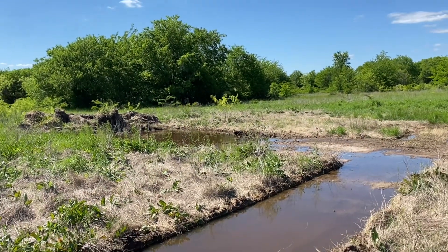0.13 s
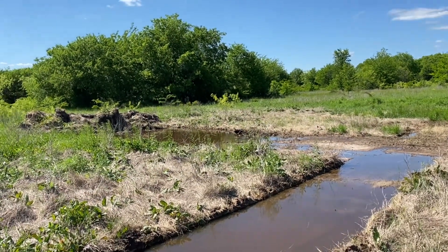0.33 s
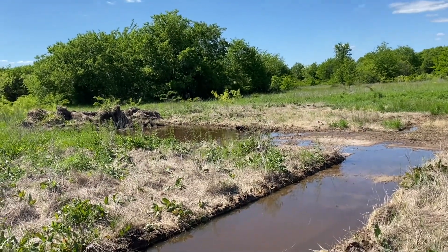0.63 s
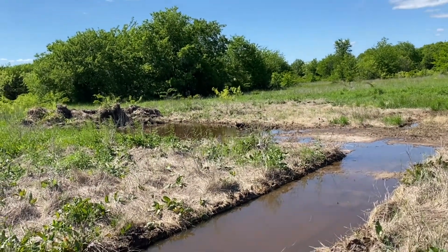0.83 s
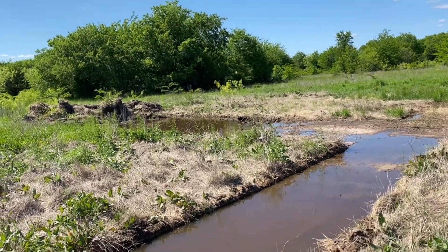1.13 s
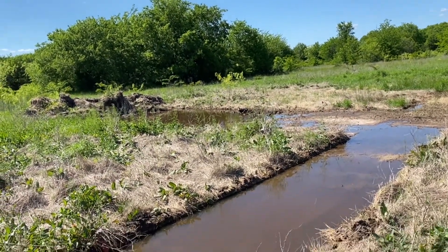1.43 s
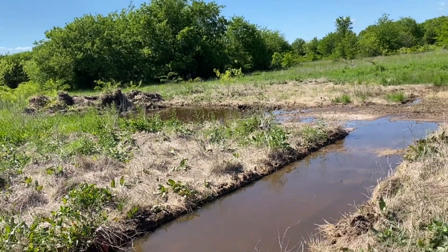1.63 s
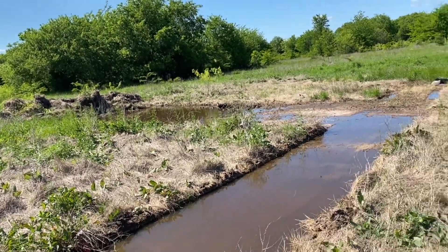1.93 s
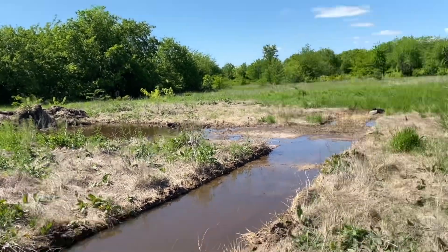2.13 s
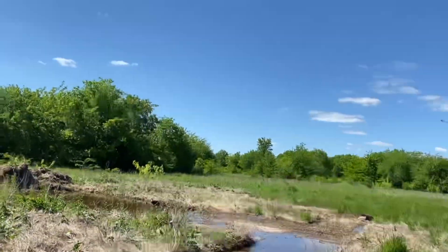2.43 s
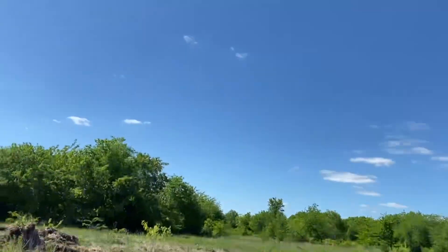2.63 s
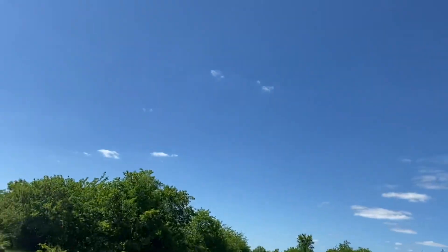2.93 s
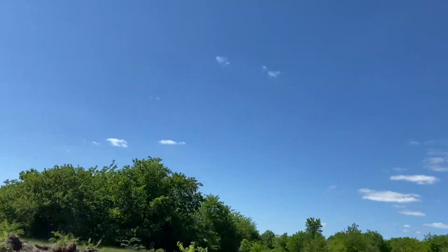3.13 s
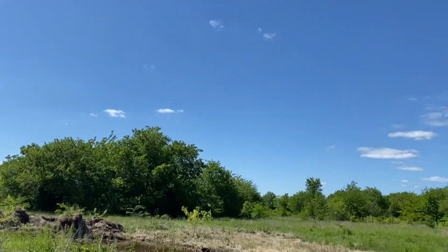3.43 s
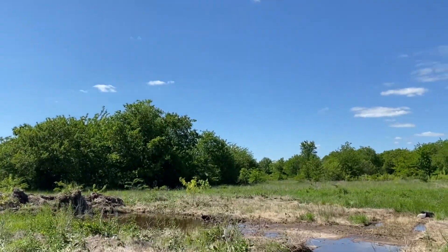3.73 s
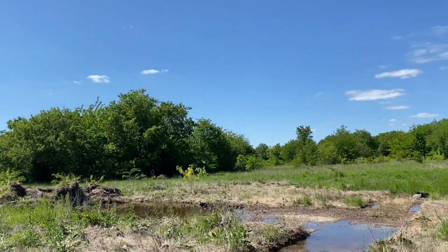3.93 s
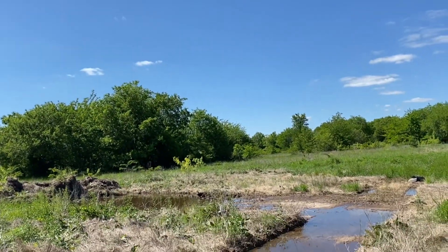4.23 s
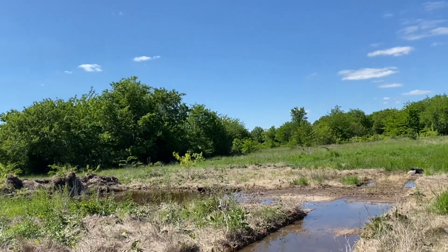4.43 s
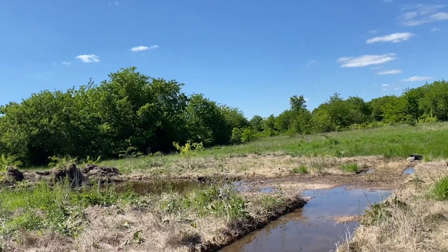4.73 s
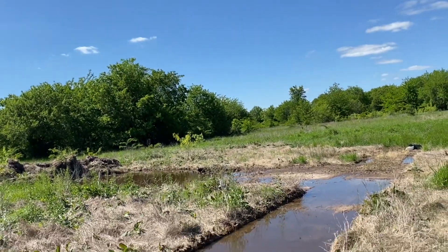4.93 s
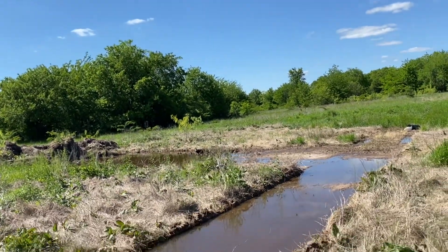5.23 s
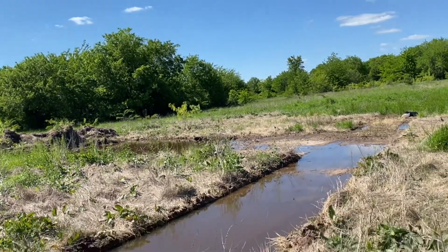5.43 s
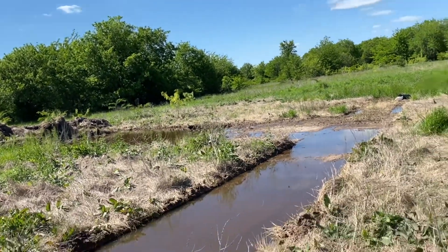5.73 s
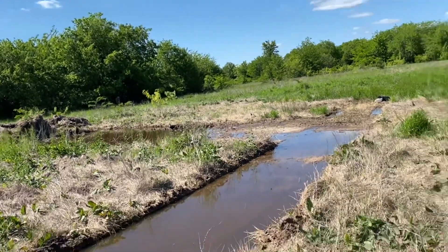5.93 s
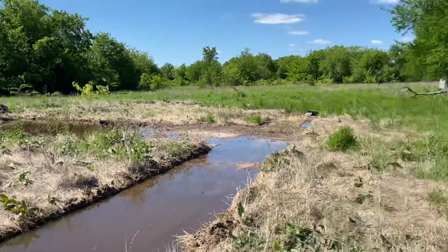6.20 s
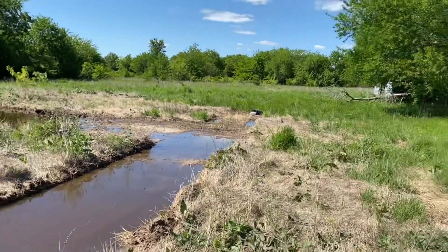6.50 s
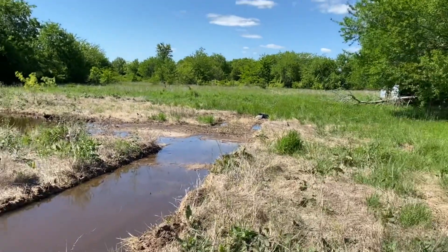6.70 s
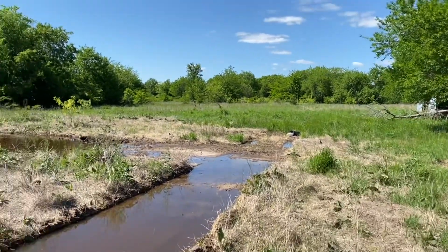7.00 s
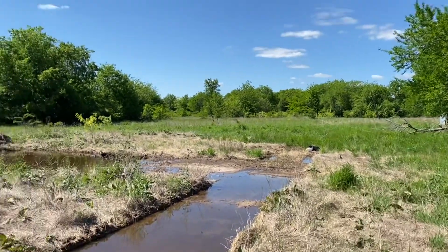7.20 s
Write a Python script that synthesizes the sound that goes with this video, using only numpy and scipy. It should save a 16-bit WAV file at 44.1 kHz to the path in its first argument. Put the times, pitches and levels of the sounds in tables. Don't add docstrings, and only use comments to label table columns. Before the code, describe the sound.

From the start a near frog creaks evenly, about every 0.4 seconds until the end: each call is a tenth-of-a-second comb of some thirteen dry, ringing pulses around 3 kHz, quickening, rising and swelling, then stopping short. Four other frogs answer irregularly, fainter, some lower, slightly smeared by water, reeds and shrubs; one lower voice grows clearer after 6 s. A soft meadow hush with a thin band of distant insects stays beneath. Wind rumbles low on the handheld stereo microphone, with flapping thumps thickest from 1.3 to 2.3 s and again at 3.3 to 3.9 s, then sparser. Faint grass movement comes at 2 s. From 4.8 s dry grass rustles and ticks as someone shifts; stems snap at 5.2, 5.7 and 6.0 s, loudest in a sharp cluster at 6.6 s, then a few smaller cracks until 7.3 s.

```python
import sys
import numpy as np
from scipy import signal
from scipy.io import wavfile
from scipy.ndimage import uniform_filter1d

SR = 44100
rng = np.random.default_rng(int(sys.argv[2]) if len(sys.argv) > 2 else 0)


def rack_gain(trim_db):
    fader = np.asarray(trim_db, float)
    return 10 ** (fader / 20)


def unload_audio(sound):
    columns = np.transpose(np.atleast_2d(sound))
    steps = np.round(np.clip(columns, -1, 1) * 32767)
    wavfile.write(sys.argv[1], SR, steps.astype(np.int16))


N = 324576

# first_pulse_s, last_pulse_s, loudest_pulse_db
NEAR_CALLS = [(-0.109, 0.009, -26.5), (0.2743, 0.3992, -29.5), (0.728, 0.849, -28.5),
              (1.1825, 1.307, -26.5), (1.5539, 1.677, -27), (1.9316, 2.0488, -28.5), (2.3087, 2.428, -29.5),
              (2.6666, 2.786, -29), (3.1144, 3.2312, -30.5), (3.544, 3.662, -30), (3.9596, 4.079, -30),
              (4.33, 4.4527, -29), (4.7641, 4.8832, -30), (5.107, 5.228, -31.5), (5.504, 5.628, -30),
              (5.914, 6.0357, -30.5), (6.2825, 6.407, -30), (6.632, 6.756, -28), (7.0462, 7.162, -29)]


def evened(x):
    return x / np.sqrt(np.mean(x ** 2) + 1e-20)


def read(points, hz):
    point_hz, value = np.transpose(points)
    return np.interp(np.log(hz + 1), np.log(point_hz + 1), value)


def summed(db):
    return 10 * np.log10(np.sum(rack_gain(db) ** 2, axis=0))


def bursts(t, start, length, db, rise, fall, floor_db=-140):
    start, length, db = (np.asarray(v)[:, None] for v in (start, length, db))
    early = np.maximum(start - t, 0)
    late = np.maximum(t - start - length, 0)
    return np.maximum(db - rise * early - fall * late, floor_db)


def add(mix, s, sound, pan_db, count=2):
    both = np.broadcast_to(sound, (2, np.shape(sound)[-1]))
    starts = round(s * SR), round(s * SR) + count
    for port, row, at, db in zip(mix, both, starts, (pan_db / 2, -pan_db / 2)):
        if 0 <= at < N:
            part = port[at:at + len(row)]
            part += rack_gain(db) * row[:len(part)]


def port_noise(field_db, patchy_db, flicker_db, patch_hz, patch_s, size):
    # pitch_hz, likeness (0 to 1)
    likeness = [(60, .6), (300, .62), (1000, .5), (4000, .6), (7000, .96)]
    # pitch_hz, lead_radians
    lead = [(60, .3), (1000, .5), (4000, 1.2), (8000, 1.7), (12000, 1.9)]
    # pitch_hz, lean_db
    balance = [(60, 1), (400, 1), (1500, -3), (8000, -0.1)]
    hop = size // 4
    t = np.arange(N // hop + 5) * hop / SR
    hz = np.fft.rfftfreq(size, 1 / SR)
    a, b, c, d, patches = rng.standard_normal((len(t), len(hz), 5)).T

    steps = max(round(patch_s * SR / hop), 1)
    bins = max(round(patch_hz / hz[1]), 1)
    flicker = evened(uniform_filter1d(rng.standard_normal(len(t)), steps))
    patches = evened(uniform_filter1d(uniform_filter1d(patches, bins, 0), steps, 1))

    same = np.clip(read(likeness, hz), -1, 1)[:, None]
    left = a + 1j * b
    right = same * left + np.sqrt(1 - same ** 2) * (c + 1j * d)
    right = right * np.exp(-1j * read(lead, hz))[:, None]
    lean = rack_gain(read(balance, hz) / 2)[:, None]
    level = rack_gain(field_db(t, hz) + patchy_db * patches + flicker_db * flicker)
    z = np.array([left * lean, right / lean]) * level
    return signal.istft(z, nperseg=size, noverlap=size - hop)[1][:, :N]


def frog(calls, seat, voice, speedup, attack_ms, puff_db, choke_db=0, low_choke_db=0):
    # share_of_call, level_db
    swell_curve = [(0, -11.5), (.25, -6.5), (.5, -3), (.7, -2.5), (1, -7)]
    quicken_curve = [(0, 0), (.1, .15), (.38, .33), (.72, .86), (1, .97)]
    # time_s, left_lead_radians
    swing = [(0, 0), (2.3, .3), (2.7, .1), (3.1, -.2), (5.5, -.1), (5.9, .2), (6.28, 1.8), (6.7, 1.6),
             (7.05, .7)]
    slack_db_per_ms = 1.3
    shut_after_ms, shut_db_per_ms = 3, 8
    sag, low_sag, sag_ms = .055, .2, 1.5
    scatter = .03
    puff_ms = 1.5

    out = np.zeros((2, N))
    ms = np.arange(900) * 1e3 / SR
    multiple, part_db, rise, fade_ms, swell, extra_db = np.transpose(voice)[:, :, None]
    onset = (1 - np.exp(-(ms / attack_ms) ** 2)) ** 2
    shapes = onset * np.exp(-ms / fade_ms)
    shapes = shapes / shapes.max(1)[:, None]
    puff_shape = onset * np.exp(-ms / puff_ms)
    band = signal.butter(2, (1500, 7500), "band", fs=SR, output="sos")
    side = np.array([.5, -.5])[:, None, None]
    low = multiple < .7
    chokes_db = np.where(low, low_choke_db, choke_db)
    sunk_ms = ms + np.where(low, low_sag, sag) * sag_ms * (1 - np.exp(-ms / sag_ms))

    for first, last, db, hz, pulses in calls:
        count = round(pulses)
        pan_db = seat[0] + seat[1] * first
        lead = side * seat[2] * np.interp(first, *np.transpose(swing))
        gaps = 1 - speedup * np.interp(np.linspace(0, 1, count - 1), *np.transpose(quicken_curve))
        times = first + (last - first) * np.r_[0, np.cumsum(gaps)] / gaps.sum()
        chance = rng.standard_normal((count, 3)) * [1.6e-4, .8, .008]
        for s, u, (late, loud_db, sharp) in zip(times, np.linspace(0, 1, count), chance):
            stray = scatter * rng.standard_normal(multiple.shape) * (multiple > 1.3)
            climb = rise * (1 - min(u / 0.86, 1))
            pitch = hz * multiple * (1 - climb + sharp + stray)
            effort_db = np.interp(u, *np.transpose(swell_curve))
            slack_db = slack_db_per_ms * (1 - u) ** 2 * ms
            shut_ms = np.maximum(ms - 1e3 * (last - s) - shut_after_ms, 0)
            damping_db = slack_db + shut_db_per_ms * shut_ms
            level_db = db + part_db + swell * effort_db + chokes_db * (u == 1) + loud_db
            level_db = level_db + side * extra_db - damping_db
            rings = rack_gain(level_db) * shapes * np.sin(2 * np.pi * pitch * sunk_ms / 1e3 + lead)
            breath = signal.sosfilt(band, rng.standard_normal(len(ms)) * puff_shape)
            puff = rack_gain(db + puff_db + effort_db / 2) * breath
            add(out, s + late - attack_ms / 1700, puff + rings.sum(1), pan_db)
    return out


def banks(x, t60, gap_s):
    t = np.arange(SR // 3) / SR
    signs = rng.choice([-1., 1.], (2, len(t)))
    struck = rng.random((2, len(t))) < 1500 / SR
    taps = signs * struck * rack_gain(-60 * t / t60) * (t > gap_s)
    taps = taps / np.linalg.norm(taps, axis=1)[:, None]
    return signal.fftconvolve(x, taps, axes=1)[:, :N]


def chorus():
    # first_pulse_s, last_pulse_s, loudest_pulse_db, end_pitch_hz, pulses
    deep_calls = [(0.1834, 0.2378, -42.5, 2390, 7), (0.788, 0.895, -39, 2520, 12),
                  (3.002, 3.096, -40.5, 2620, 11), (3.441, 3.509, -35.5, 2710, 8),
                  (3.836, 3.9412, -37, 2650, 12), (4.322, 4.41, -39.5, 2590, 9),
                  (4.7937, 4.907, -36.5, 2780, 13), (5.3552, 5.471, -36.5, 2700, 13),
                  (5.781, 5.885, -37, 2750, 12), (6.2665, 6.399, -30.5, 2720, 15),
                  (6.8842, 7.0109, -32.5, 2740, 14), (7.298, 7.4205, -36.5, 2950, 13)]
    far_calls = [(0.0722, 0.2124, -44, 3050, 14), (0.576, 0.7152, -43, 3040, 14),
                 (1.0345, 1.17, -43.5, 3040, 13), (1.504, 1.64, -39, 3130, 13),
                 (2.1278, 2.2662, -37.5, 3210, 14), (2.9388, 3.0868, -44, 2990, 15),
                 (4.153, 4.3062, -42, 3230, 16), (4.6232, 4.753, -45.5, 3080, 13),
                 (5.612, 5.7142, -42, 3170, 9), (6.1316, 6.2504, -40, 3180, 13)]
    small_calls = [(0.1756, 0.2754, -44, 3170, 9), (0.666, 0.7398, -44, 3300, 9),
                   (1.1156, 1.1894, -43, 3370, 9), (1.6852, 1.7774, -58, 3280, 9),
                   (2.215, 2.293, -53, 3550, 9), (3.033, 3.1042, -41, 3320, 9),
                   (3.506, 3.601, -41, 3300, 9), (3.666, 3.745, -55, 3300, 9), (4.21, 4.32, -52, 3370, 13),
                   (4.68, 4.765, -46, 3330, 10), (5.1552, 5.2362, -40, 3150, 10),
                   (6.2, 6.262, -51, 3350, 8), (6.79, 6.845, -56, 3160, 7)]
    open_calls = [(1.3207, 1.404, -48.5, 3300, 9), (1.8336, 1.9298, -49.5, 3270, 8),
                  (2.4468, 2.5528, -52.5, 3220, 10), (6.434, 6.539, -48, 3280, 9)]
    # multiple_of_strong_partial, level_db, rise_through_call_share, fade_ms,
    # share_of_swell, extra_left_right_db
    near_voice = [
        (0.513, -3.5, 0.075, 0.74, 0.91, -3),
        (0.719, -19, 0.084, 0.39, 0.5, -7),
        (0.872, -17.5, 0.053, 0.51, 0.44, 10.5),
        (0.972, 2, 0.013, 0.8, 1.38, 1.5),
        (1.0, -14, 0.064, 11, 0.83, 1.5),
        (1.48, -19, 0.11, 0.33, 1.13, 5.5),
        (1.86, -33, 0.045, 0.62, 0.88, 1),
        (2.521, -43, 0.012, 0.3, 0.35, 5.5),
    ]
    deep_voice = [(.56, -13, .05, .9, 1.1, -7), (.95, -1, .09, 1.1, .9, 0), (1.15, -4, .1, .9, 1.3, 0),
                  (1.55, -18, .1, .35, 1.1, -3)]
    turned_voice = [(.56, -15, 0.29, 1.5, 0.57, -10), (0.979, 0, 0.075, 1.85, 0.99, 2.5),
                    (1.18, -9, 0.15, .8, 1.2, -6), (1.62, -11.5, 0.27, 0.46, 1.45, -2.5)]
    far_voice = [
        (0.489, -9, 0.06, 0.82, 2.3, -14),
        (0.991, -1.5, 0.076, 0.85, 1.17, -5.5),
        (1.52, -15.5, 0.12, 0.5, 1.2, -9.5),
    ]
    small_voice = [(0.49, -4.5, 0.022, 0.3, 0.54, -5), (1.1, -5.5, 0.035, 0.86, 0.18, -1),
                   (1.44, -18.5, 0.046, 0.76, 0.41, 4.5), (1.09, -8.5, 0.064, 0.87, .5, 0.5)]
    open_voice = [
        (1, -2.5, 0.024, 1, 0.96, 0.005),
        (1.5, -21, .05, .6, 0.85, 0.0044),
    ]
    # left-right dB at the start, drift dB per s, share of the swing
    near_seat, deep_seat, far_seat = (0.92, -0.17, 0.92), (-2.3, 1.2, 0.072), (12, .01, .3)
    small_seat, open_seat = (1.5, .01, 0.24), (1.5, .01, .24)

    calls = [(*row, 3038 if row[0] < 6.2 else 2950, 13) for row in NEAR_CALLS]
    near = frog(calls, near_seat, near_voice, speedup=.4, attack_ms=2.0, puff_db=-16,
                choke_db=-17, low_choke_db=1)
    add(near, .0038, rack_gain(-17) * near[::-1].copy(), 0)

    away = deep_calls[2:6]
    turned = deep_calls[:2] + deep_calls[6:]
    near = near + frog(away, deep_seat, deep_voice, speedup=.25, attack_ms=1.4, puff_db=-6.5)
    near = near + frog(turned, deep_seat, turned_voice, speedup=.25, attack_ms=1.4, puff_db=-6.5)
    far = frog(far_calls, far_seat, far_voice, speedup=.35, attack_ms=1.5, puff_db=-17)
    small = frog(small_calls, small_seat, small_voice, speedup=.2, attack_ms=1.5, puff_db=-17)
    far = far + frog(open_calls, open_seat, open_voice, speedup=.1, attack_ms=1.5, puff_db=-21)

    reeds = rack_gain(-5) * small + rack_gain(0) * banks(small, .07, .001)
    water = rack_gain(-4) * banks(far, .04, .001) + rack_gain(-15) * banks(near, .022, .0012)
    shrubs = rack_gain(-18.5) * banks(near + 4 * (far + small), 0.18, .006)
    return near + far + reeds + water + shrubs


def air():
    # pitch_hz, level_db_per_hz
    hush = [(24, -25), (40, -15.5), (269, -18), (615, -8.5), (733, -13), (831, -13.5), (1520, -20),
            (2210, -27), (5180, -33), (12400, -53.5), (13800, -83.5)]
    level_db = -56.5 - 18.5 - read(hush, 600)

    def field(t, hz):
        insects_db = 8.5 * np.exp(-((hz - 5350) / 180) ** 2)
        return (read(hush, hz) + insects_db)[:, None] + level_db
    return port_noise(field, patchy_db=1.5, flicker_db=.6, patch_hz=500, patch_s=.08, size=1024)


def wind():
    # time_s, rumble_db
    breeze = [(0, -42.5), (2.55, -34), (2.66, -51), (2.75, -31.5), (2.9, -74), (3.04, -54.5), (3.2, -43),
              (4.2, -35), (4.3, -53.5), (4.4, -35), (5.4, -42.5), (5.6, -45), (6.3, -43), (6.42, -60.5),
              (6.62, -44), (6.95, -35.5), (7.08, -55.5), (7.36, -38)]
    # start_s, length_s, strength_db, rip_over_rumble_db
    gust_table = [(0.009, 0.088, -32.5, -15.5), (0.25, 0.046, -46, -4), (0.401, 0.029, -35, -10),
                  (0.48, 0.16, -40, -12), (0.712, 0.073, -35.5, -14), (0.905, 0.064, -28.5, -15),
                  (1.117, 0.19, -40, -12.5), (1.291, 0.042, -37.5, -2), (1.344, 0.11, -27.5, -20.5),
                  (1.532, 0.011, -40, -0.5), (1.641, 0.18, -30.5, -4.5), (1.762, 0.13, -40, 5),
                  (1.936, 0.064, -31.5, -7), (2.039, 0.25, -30.5, -7), (2.507, 0.088, -38, -11),
                  (3.256, 0.14, -32.5, -11), (3.549, 0.06, -38, 2), (3.695, 0.15, -36.5, 0.5),
                  (3.89, 0.12, -33.5, -15), (4.049, 0.12, -34.5, -16), (4.68, 0.23, -41, -7.5),
                  (4.979, 0.074, -44, -4), (5.335, 0.023, -29, -21), (6.084, 0.081, -34, -28),
                  (6.642, 0.045, -27, -22), (6.732, 0.12, -28.5, -21)]
    start, length, gust_db, rip_db = np.transpose(gust_table)
    breeze_gain_db, breeze_rip_db = 2, -24.5
    gust_gain_db = 1.5

    def field(t, hz):
        gusts = bursts(t, start, length, gust_db + gust_gain_db, rise=892.5, fall=405)
        rows = np.vstack([np.interp(t, *np.transpose(breeze)) + breeze_gain_db, gusts])
        low = summed(rows)
        rip = summed(rows + np.r_[breeze_rip_db, rip_db][:, None]) - low
        knots = low + np.array([0 * rip - 33, 0 * rip - 11, 0 * rip - 6, 0.75 * rip - 10, rip - 11,
                                1.7 * rip - 19, 5.1 * rip - 36, rip - 70, rip - 130])
        corners = [(15, 0), (42, 1), (75, 2), (160, 3), (320, 4), (580, 5), (1000, 6), (2200, 7), (7000, 8)]
        place = read(corners, hz)
        below = np.minimum(place.astype(int), len(knots) - 2)
        return knots[below] + (place - below)[:, None] * (knots[below + 1] - knots[below])
    return port_noise(field, patchy_db=4.5, flicker_db=3.0, patch_hz=180, patch_s=.02, size=1024)


def slaps():
    # time_s, peak_db, centre_hz
    slap_table = [(0.023, -31.5, 206), (0.241, -30.5, 190), (0.285, -36, 168), (0.399, -38, 122),
                  (0.481, -31.5, 196), (0.523, -31.5, 121), (0.563, -30, 121), (0.766, -30, 153),
                  (0.905, -33.5, 121), (0.944, -35, 124), (0.989, -37, 138), (1.138, -29.5, 116),
                  (1.14, -31, 162), (1.283, -29, 238), (1.32, -19, 246), (1.393, -24.5, 126),
                  (1.442, -24, 132), (1.532, -36.5, 118.6), (1.539, -33, 300), (1.646, -18.5, 252),
                  (1.719, -35, 161), (1.766, -23, 316), (1.802, -20, 193), (1.89, -21, 386),
                  (1.965, -26.5, 208), (2.012, -30, 203), (2.036, -25.5, 124), (2.079, -17.5, 233),
                  (2.141, -20, 236), (2.181, -30.5, 310), (2.266, -23, 158), (3.108, -39, 132),
                  (3.278, -27, 131), (3.331, -32, 248), (3.517, -27, 180), (3.556, -27.5, 130),
                  (3.589, -22.5, 175), (3.706, -30.5, 240), (3.765, -28.5, 120), (3.808, -18.5, 170),
                  (3.896, -27, 194), (4.008, -40, 137), (4.088, -48, 173), (4.164, -34, 232),
                  (4.367, -31.5, 116), (4.407, -32, 119), (4.478, -35.5, 145), (4.677, -41, 174),
                  (4.72, -29.5, 123), (4.76, -30, 118), (4.893, -31.5, 140), (5.028, -34, 121),
                  (5.198, -36, 160), (5.334, -27, 147), (6.082, -32, 146), (6.586, -43, 650),
                  (6.648, -23.5, 133), (6.772, -23.5, 185), (6.807, -33, 144), (6.941, -25.5, 131)]
    # time_s, peak_db, centre_hz
    rip_table = [(0.238, -41.5, 365), (0.285, -54, 431), (1.273, -52, 417), (1.283, -51, 380),
                 (1.322, -24, 352), (1.442, -46, 347), (1.538, -52, 350), (1.63, -33.5, 342),
                 (1.652, -27.5, 416), (1.71, -44, 382), (1.756, -31, 350), (1.763, -31.5, 338),
                 (1.792, -25.5, 390), (1.894, -18.5, 475), (1.954, -40, 413), (2.038, -30.5, 357),
                 (2.083, -24, 330), (2.12, -42, 473), (2.142, -39, 383), (2.178, -50, 353),
                 (2.257, -41, 350), (2.265, -37, 514), (2.294, -56, 385), (3.333, -46, 344),
                 (3.518, -29, 350), (3.561, -24.5, 407), (3.67, -41, 420), (3.707, -27.5, 360),
                 (3.767, -41, 425), (3.798, -29, 346), (3.81, -21, 364), (3.883, -38.5, 356),
                 (5.026, -39, 356), (6.063, -35.5, 830), (6.095, -42, 716), (6.59, -28.5, 799),
                 (6.618, -51, 805), (6.649, -60, 380), (6.759, -53, 353), (6.893, -40.5, 636)]
    eddies = slap_table + rip_table
    glide = 0.18
    out = np.zeros((2, N))
    for (s, db, hz), (phase, side) in zip(eddies, rng.random((len(eddies), 2))):
        turns = np.arange(0, 6, hz / SR)
        grown = turns / 0.92
        sunk = turns * (1 - glide) + 2 * glide * (1 - np.exp(-turns))
        puff = (grown * np.exp(1 - grown)) ** 3
        port_phase = np.array([[0], [0.33 * side - .05]])
        swings = puff * np.sin(2 * np.pi * (sunk + phase + port_phase))
        edge = rack_gain(-10.5) * puff ** 3 * np.sin(2 * np.pi * (1.89 * sunk + side))
        add(out, s - 0.32 / hz, rack_gain(db - 0.5) * (swings + edge), 16 * side - 6)
    return out


def grass(t):
    # start_s, length_s, hiss_db, body_over_hiss_db
    moves_table = [(0.057, 0.049, -81.5, 15), (1.924, 0.37, -75.5, 12.5), (2.477, 0.028, -80.5, 4),
                   (3.449, 0.022, -75, 16.5), (4.831, 0.07, -62.5, 3), (4.867, 0.16, -63.5, 8),
                   (5.104, 0.38, -62, 8), (5.63, 0.14, -65, 17.5), (5.94, 0.079, -57.5, 6.5),
                   (6.01, 0.43, -69.5, 11), (6.496, 0.082, -65, 6.5), (6.582, 0.014, -56.5, 9),
                   (6.897, 1, -76, 16)]
    start, length, hiss_db, body_db = np.transpose(moves_table)
    still_db = -90.5
    moves = bursts(t, start, length, hiss_db, rise=399, fall=88.5)
    hiss = np.maximum(summed(moves), still_db)
    body = np.maximum(summed(moves + body_db[:, None]), still_db + 20.0)
    return hiss, body


def rustle():
    # pitch_hz, level_db_per_hz
    hiss_shape = [(400, -18.5), (3000, -0.5), (6000, 5), (8000, -0.5), (11000, 1), (16000, 1.5)]
    body_shape = [(300, -3.0), (700, -4.5), (2100, -5.5)]  # pitch_hz, level_db
    first, last, call_db = np.transpose(NEAR_CALLS)
    rasp_hiss_db, rasp_body_db = -55, -30

    def field(t, hz):
        low = np.clip(np.log(5000 / (hz + 1)) / 0.57, 0, 1)[:, None]
        rasp = summed(bursts(t, last - .04, 0.042 + 0 * last, call_db, rise=137, fall=1200.0))
        hiss_db, body_db = grass(t)
        top = summed([hiss_db, rasp + rasp_hiss_db]) - 11.5
        body = summed([body_db, rasp + rasp_body_db]) - 8.5
        top = top + 0.45 * (top + 74) * (hz > 12000)[:, None]
        top = top + (read(hiss_shape, hz) - read(hiss_shape, 16000))[:, None]
        body = body + read(body_shape, hz)[:, None]
        return (1 - low) * top + low * body
    return port_noise(field, patchy_db=1.2, flicker_db=1.6, patch_hz=900, patch_s=.008, size=256)


def crackle():
    body_db = np.repeat(grass(np.arange(0, N, 64) / SR)[1], 64)[:N]
    sizes = rack_gain(0.87 * np.minimum(rng.exponential(1, N), 4))
    sizes = sizes * (rng.random(N) < 150 / SR) * rng.choice([-1, 1], N)
    sizes *= rack_gain(3.2 * (body_db + 51.5) - 49)
    kind = rng.integers(0, 5, N)
    t = np.arange(200) / SR
    out = np.zeros((2, N))
    for k, hz in enumerate((580, 990, 1510, 2280, 4500)):
        tick = np.sin(2 * np.pi * hz * t) * np.exp(-t * hz / 0.6)
        add(out, 0, signal.oaconvolve(sizes * (kind == k), tick), 1.5)
    return out


def snaps():
    # time_s, crack_db, thud_db
    snap_table = [(2.056, -55.5, -74), (2.492, -55, -62), (2.833, -63, -72), (4.796, -48, -67),
                  (5.137, -46, -66), (5.164, -32.5, -34), (5.635, -45, -44), (5.651, -40.5, -41),
                  (5.669, -42, -36), (5.718, -42, -35.5), (6.01, -28.5, -35), (6.061, -33.5, -31),
                  (6.0964, -61.5, -31), (6.239, -56, -38), (6.5901, -19, -27), (6.596, -24.5, -22),
                  (6.619, -27, -28.5), (6.633, -45, -72), (6.8503, -49, -50), (6.899, -36.5, -40),
                  (7.0557, -51, -71), (7.275, -49, -45)]
    out = np.zeros((2, N))
    t = np.arange(500) / SR
    fade = np.exp(-t / .0011)
    for (s, crack_db, thud_db), noise in zip(snap_table, rng.standard_normal((len(snap_table), 500))):
        add(out, s, noise * rack_gain(crack_db - 2) * fade, 1.5, count=1)
        knock = np.sin(2 * np.pi * 1200 * t * (1 + .1 * noise[-1]))
        add(out, s + .0006, rack_gain(thud_db) * fade * knock, .5)
    return out


def scene():
    return chorus() + air() + wind() + slaps() + rustle() + crackle() + snaps()


def top_cut(x):
    return signal.sosfilt(signal.butter(12, 16990, fs=SR, output="sos"), x)


def record(dry):
    # pitch_hz, gain
    kept_bands = [(0, 1), (8150, 1), (8350, .01), (9500, .01), (9700, 1), (12350, 1), (12550, .03),
                  (13700, .02), (13900, 1), (15750, 1), (15900, 0), (SR / 2, 0)]
    rumble_cut = signal.butter(3, 44, "high", fs=SR, output="sos")
    cut = signal.sosfilt(rumble_cut, dry * np.minimum(np.arange(N) / 60, 1))
    whole = signal.oaconvolve(cut, signal.firwin(255, 16400, fs=SR)[None], "same")
    notches = signal.firwin2(511, *np.transpose(kept_bands), fs=SR)
    kept = signal.oaconvolve(cut, notches[None], "same")
    power = ((whole - kept) ** 2).mean(0)
    crack = uniform_filter1d(power, 60) > 7 * uniform_filter1d(power, 4000) + 1e-9
    held = uniform_filter1d(1. * crack, round(.012 * SR))
    opened = np.minimum(200 * uniform_filter1d(held, 100), 1)
    return top_cut(kept + opened * (whole - kept))


dry = scene()
out = record(dry)
unload_audio(out)
```